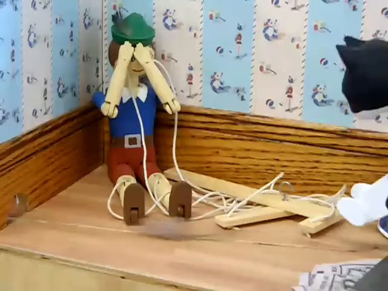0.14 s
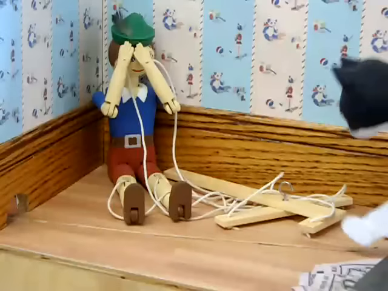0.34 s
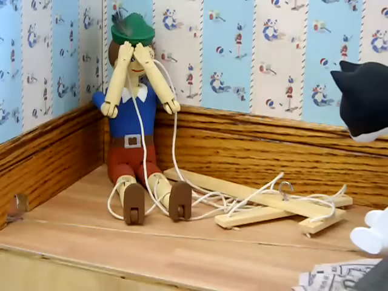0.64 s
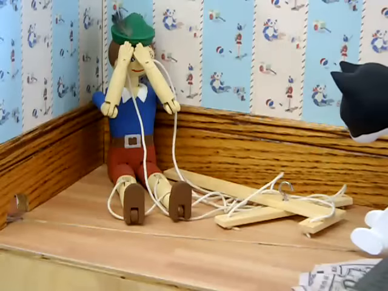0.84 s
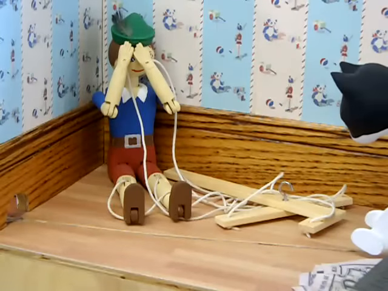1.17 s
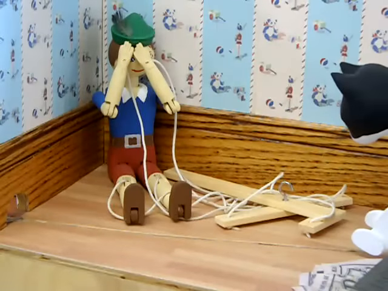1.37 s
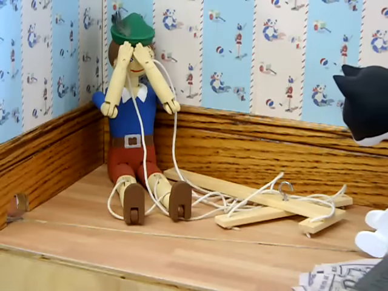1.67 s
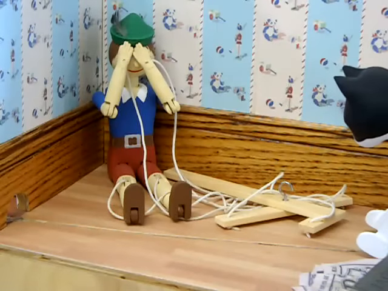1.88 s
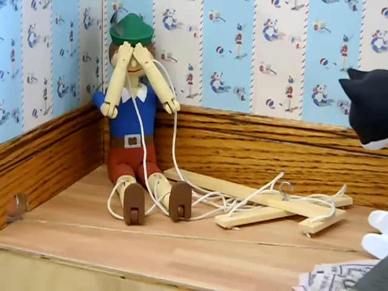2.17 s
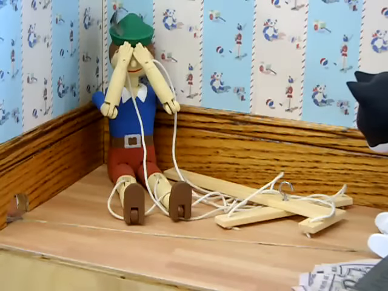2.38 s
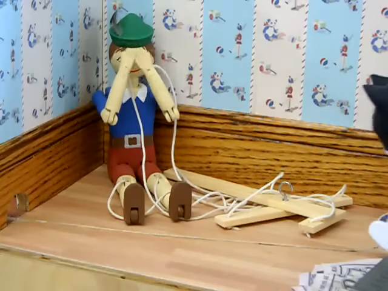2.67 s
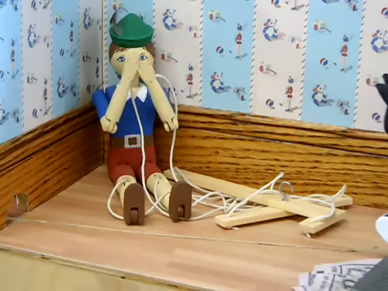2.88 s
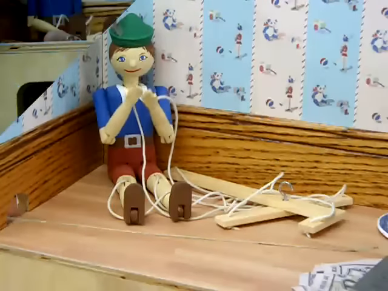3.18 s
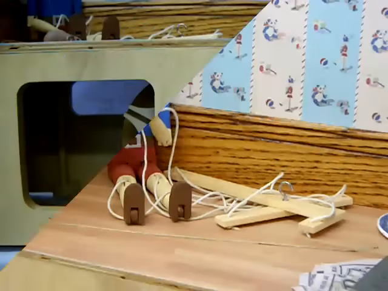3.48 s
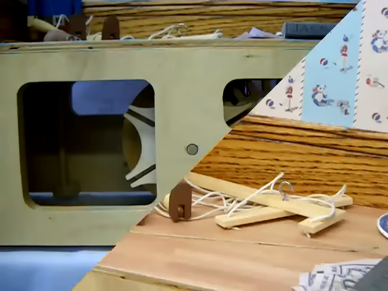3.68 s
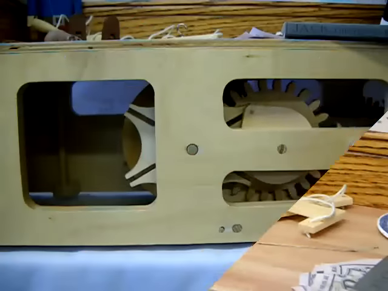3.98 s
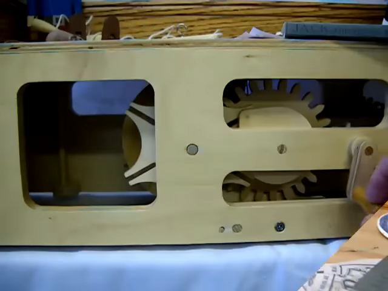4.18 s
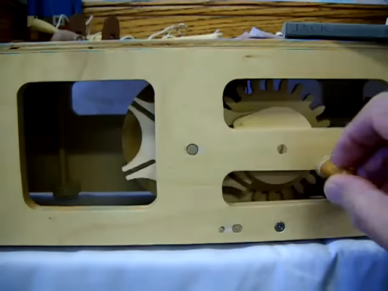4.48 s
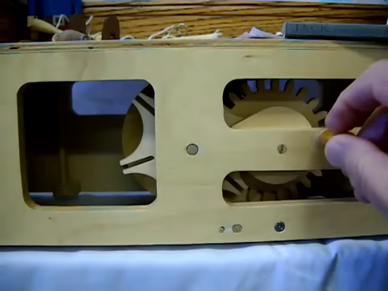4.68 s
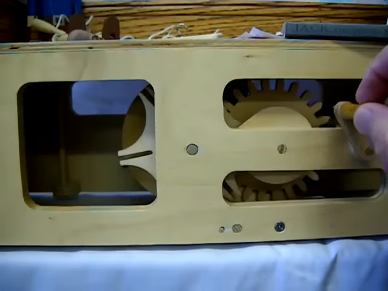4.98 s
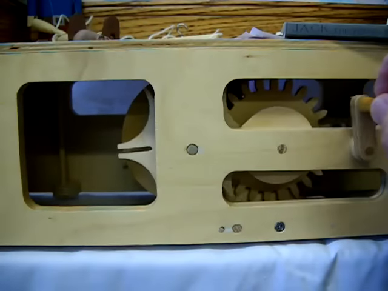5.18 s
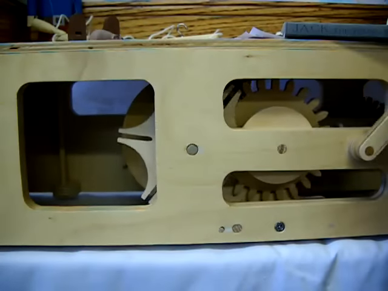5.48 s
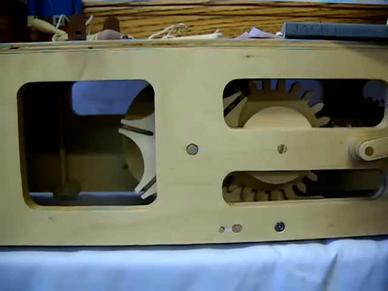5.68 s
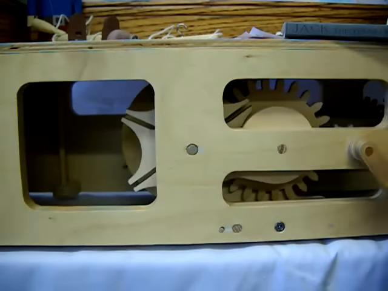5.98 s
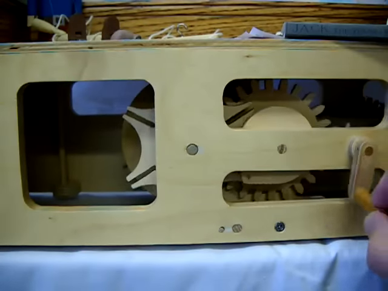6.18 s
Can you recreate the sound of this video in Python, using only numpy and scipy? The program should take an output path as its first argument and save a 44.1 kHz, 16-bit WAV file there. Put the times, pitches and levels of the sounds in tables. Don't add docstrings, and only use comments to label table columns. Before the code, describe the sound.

A quiet small room with steady soft hiss and a faint low mains hum of about 60 Hz that swells and fades. From 0 to 0.4 s, light wooden gear ticks and soft hollow knocks. At about 0.46 s a catch snaps very loudly, and a slide rattles and scrapes dryly along its wooden rail, densest near 0.5 s, with another burst of hard knocks at 0.97 to 1.03 s, stopping by 1.1 s. From 1.1 to 2.7 s, sparse small ticks over faint rubbing. At 2.82 s a lever lands with one sharp, dry clack and tiny rebounds. From 3 s the works sound closer: rougher shaft rub, ticks and boxy knocks, with a brighter click at 3.9 s. After 4.6 s the rub eases, leaving spaced clicks, one clearer near 6 s, until about 6.3 s. Small camera microphone, limited treble, short tail.

```python
import sys
import numpy as np
from scipy import signal
from scipy.fft import rfft, irfft
from scipy.io import wavfile
from scipy.ndimage import uniform_filter1d

SR = 44100
rng = np.random.default_rng(int(sys.argv[2]) if len(sys.argv) > 2 else 0)


def transcribe(u):
    v = np.clip(np.atleast_2d(u).T, -1, 1)
    q = np.round(v * 32767).astype(np.int16)
    wavfile.write(sys.argv[1], SR, q)


def field_ratio(decibels):
    return 10 ** (np.asarray(decibels, dtype=float) / 20)


N = 279594

# frequency in Hz, density in dB per Hz.
AIR_SPECTRUM = [(12, -42), (20, 4), (54, -10), (109, -7.5), (280, -11), (407, -8), (1220, -12),
                (2220, -14.5), (3220, -18), (4030, -21.5), (4920, -24.5), (6000, -32.5), (7700, -51),
                (10000, -83), (16900, -120)]
# middle in seconds, length in seconds, level in dB.
HUM_SWELLS = [
    (.2, .9, -55.5),
    (.93, .45, -54),
    (1.3, .6, -55.5),
    (1.75, .5, -62),
    (2.3, .9, -53.5),
    (2.97, .24, -57),
    (3.58, 1.0, -52.5),
    (4.45, .55, -49),
    (5.0, .7, -54.5),
    (5.82, .85, -54.5),
]
# time in seconds, level in dB, linear between rows.
SHAFT_RUB = [(0.0, -52), (0.35, -60), (1.45, -60), (1.9, -55), (2.75, -55), (2.98, -58), (3.05, -47.5),
             (4.45, -46.5), (4.67, -55), (5.6, -58), (6.0, -53), (6.34, -54)]
# frequency in Hz, density in dB per Hz.
RASP_SPECTRUM = [(760, -19), (1300, -6.5), (1590, -3), (2720, -7.5), (3150, -9.5), (4030, -12),
                 (5060, -16.5), (6370, -21), (7600, -21.5), (9880, -75), (16700, -120)]
# ring in Hz, width in Hz, level in dB.
BOX_PANELS = [(364, 133, -7.5), (447, 240, -2), (537, 133, 0.5), (702, 200, -3), (829, 232, -5.5),
              (1135, 116, -10)]
# start in seconds, peak in dB, main ring in Hz.
TEETH_ABOVE = [(0.0094, -41.5, 2030), (0.1481, -38, 2380), (0.283, -38.5, 2560), (0.386, -44, 2250),
               (0.399, -39, 3220), (1.1109, -42, 3170), (1.2241, -38.5, 2620), (1.3717, -47, 2230),
               (1.5281, -39, 3100), (1.6665, -39.5, 2300), (1.7804, -43, 2100), (1.8827, -40.5, 3160),
               (1.9195, -41, 2520), (2.0118, -40, 2700), (2.1335, -39.5, 2170), (2.2425, -37, 3190),
               (2.3565, -40.5, 2010), (2.4515, -48, 2510), (2.4755, -40, 2900), (2.6554, -41, 2330)]
# start in seconds, peak in dB, main ring in Hz.
TEETH_BESIDE = [(2.9327, -39.5, 3140), (3.03, -39, 1680), (3.0706, -42, 3030), (3.086, -37, 3150),
                (3.2294, -36.5, 3300), (3.259, -35, 2130), (3.2982, -42, 2390), (3.3111, -39, 3220),
                (3.3773, -40.5, 3310), (3.5064, -36, 2280), (3.5347, -36.5, 3310), (3.6273, -41, 2360),
                (3.932, -43, 2520), (4.0447, -42.5, 1770), (4.0846, -42.5, 3350), (4.145, -41.5, 1890),
                (4.2297, -45, 1650), (4.2403, -44, 2400), (4.4237, -44, 2070), (4.4707, -44, 3060),
                (4.5288, -37, 1680)]
# start in seconds, peak in dB, main ring in Hz,
# scuff length in seconds.
STAR_PINS = [(3.7442, -35.5, 3170, .003), (3.7539, -34, 3480, .006), (3.8967, -29.5, 3400, .003),
             (4.3505, -36, 3170, .003), (4.6243, -39.5, 3190, .006), (4.8268, -38, 3310, .0055),
             (5.3525, -35.5, 2600, .007), (5.5903, -37, 2500, .008), (5.7693, -42, 2400, .012),
             (5.9853, -30.5, 3200, .003), (6.1155, -37, 3220, .0045), (6.1236, -40, 3300, .005),
             (6.1579, -46, 3560, .006), (6.2635, -38.5, 2600, .004), (6.2764, -45, 3290, .005)]
# ring in Hz, width in Hz, level in dB.
TOOTH_RINGS = [(2360, 305, -6), (3220, 370, 5), (3620, 250, -12.5)]
# ring in Hz, width in Hz, level in dB.
TOP_RINGS = [(4400, 300, -7), (4800, 380, 0), (5400, 700, -16)]
# ring in Hz, width in Hz, level in dB.
PIN_RINGS = [(2340, 500, -1), (3190, 280, 10), (3620, 250, -4)]
# ring in Hz, width in Hz, level in dB.
RAIL_RINGS = [(1700, 900, -8), (2600, 1800, -10), (3800, 1300, -10), (5600, 1500, -19)]
# wheel share in dB, top share in dB, scuff length in seconds, tap over scuff.
ABOVE_CONTACT = (-9, -11, .005, 6)
BESIDE_CONTACT = (-2, -12, .0055, 4)
PIN_CONTACT = (-12, -7.5, 6)
JOLT_CONTACT = (-7, -17, .0052, 3)
CRACK_CONTACT = (-5, -17)
# start in seconds,
# peak in dB, panel in Hz.
BACKLASH_KNOCKS = [(0.097, -46, 510), (0.16, -44, 560), (0.287, -40, 756), (0.39, -40.5, 430),
                   (1.225, -41.5, 746), (1.606, -42, 420), (1.783, -42.5, 422), (1.88, -39.5, 660),
                   (2.009, -42, 915), (2.135, -39.5, 921), (2.242, -39, 550), (2.361, -38.5, 706),
                   (2.396, -43, 620), (2.474, -42, 420),
                   (3.026, -35.5, 656), (3.217, -42, 417), (3.26, -31.5, 850), (3.369, -38, 507),
                   (3.508, -39, 560), (3.54, -42, 708), (3.68, -32.5, 615), (3.882, -40.5, 574),
                   (4.147, -43.5, 744), (4.199, -44, 440), (4.329, -32.5, 480), (4.472, -38, 600),
                   (4.531, -36.5, 530), (4.626, -38, 810), (4.827, -41.5, 544), (5.168, -42.5, 536),
                   (5.281, -44.5, 585), (5.355, -38.5, 530), (5.591, -42, 797), (5.772, -43.5, 436),
                   (6.117, -38, 545), (6.19, -43, 550), (6.267, -40.5, 540)]
# time in seconds, level in dB.
SLIDE_CREEP = [
    (0.36, -66),
    (0.41, -51),
    (0.44, -51),
    (0.457, -42),
    (0.475, -42),
]
# time in seconds, level in dB.
SLIDE_RUN = [
    (0.5, -39.5),
    (0.6, -41.5),
    (0.65, -46),
    (0.72, -42),
    (0.84, -42),
    (0.885, -38.5),
    (0.99, -41),
    (1.055, -44.5),
    (1.12, -66),
]
# start in seconds, peak in dB, main ring in Hz.
SLIDE_JOLTS = [(0.4836, -22, 2520), (0.504, -31, 3160), (0.514, -20, 3620), (0.5317, -18, 3800),
               (0.5344, -23, 4400), (0.5494, -28.5, 2900), (0.569, -31, 1700), (0.594, -31.5, 3100),
               (0.636, -33.5, 2540), (0.6805, -32, 1700), (0.72, -35, 1540), (0.732, -34, 1650),
               (0.7801, -33, 2900), (0.831, -34, 2210), (0.8726, -30, 1560), (0.8956, -32, 1870),
               (0.95, -38, 1610), (0.966, -20, 3120), (0.974, -23, 1880), (1.0066, -26, 3080),
               (1.019, -38, 1800), (1.0306, -21, 1720), (1.036, -32, 2000), (1.052, -33, 2860)]
# start in seconds, peak in dB, main ring in Hz,
# scuff length in seconds.
CRACKS = [
    (0.4645, -14.5, 2420, 0.0017),
    (.468, -17.5, 1770, 0.006),
    (2.803, -43, 2400, 0.0075),
    (2.818, -16.5, 2850, 0.0012),
    (2.8205, -20, 3000, 0.0015),
    (2.825, -30, 3030, 0.0024),
]
# start in seconds, peak in dB, panel in Hz,
# decay t60 in seconds, frame share in dB.
BOX_BLOWS = [(0.425, -34, 700, 0.096, -10), (0.465, -12.5, 760, 0.045, -14), (.5, -30, 500, .08, 0),
             (0.535, -20, 684, 0.15, -25), (.572, -29, 700, .1, -20), (0.777, -31, 694, 0.064, -14),
             (0.868, -33, 830, 0.12, -21), (0.928, -31, 720, 0.075, -18), (0.967, -22, 600, 0.08, -22),
             (1.03, -23, 592, 0.08, -7), (2.8205, -20, 630, 0.08, -10)]
# start in seconds, level in dB, decay t60 in seconds.
FRAME_THUMPS = [
    (.44, -47, .6),
    (.466, -40, .6),
    (.52, -42, .5),
    (.63, -50, .8),
    (1.033, -39, .3),
    (2.822, -47, .3),
]
# frequency in Hz, t60 in seconds.
ROOM_DECAY = [(200, 0.7), (1000, 0.43), (3000, 0.12), (7000, 0.14)]
# frequency in Hz, level in dB.
MIC_RESPONSE = [(20, -1), (4800, 0), (5800, -2), (6600, -7), (7600, -19)]
# frequency in Hz, width in Hz, depth in dB.
MIC_PORT = (4020, 300, -14)
# lower band edge in Hz, least level of the band's strongest line in dB.
GATE_BANDS = [(7650, -97.5), (8800, -101.7), (9600, -95.3), (10650, -90.5), (11500, -88.5), (12300, -80.5),
              (13100, -74), (13700, 0)]
STRAY_EDGES = [200, 900, 1600, 2300, 3000, 3900, 4600, 5500, 6500, 7600, 9000, 10000, 11400]

CAMERA_RATE = 16000


def evened(x):
    return x / np.sqrt(np.mean(x ** 2) + 1e-20)


def peaked(x):
    return x / abs(x).max()


def read(points, hz):
    f, value = np.transpose(points)
    return np.interp(np.log(hz + 1), np.log(f + 1), value)


def follow(rows):
    s, level_db = np.transpose(rows)
    return np.interp(np.arange(N) / SR, s, level_db)


def add(mix, s, sound):
    part = mix[round(s * SR):][:len(sound)]
    part += sound[:len(part)]


def colour(x, points):
    gain = field_ratio(read(points, np.fft.rfftfreq(len(x), 1 / SR)))
    return irfft(rfft(x) * gain, len(x))


def ring(x, hz, width):
    pole = np.exp((2j * np.pi * hz - np.pi * width) / SR)
    return 2 * signal.lfilter([1 - abs(pole)], [1, -pole], x).real


def modes(x, table):
    out = 0
    for k, (hz, width, db) in enumerate(table):
        out = out + (-1) ** k * field_ratio(db) * ring(ring(x, hz, width), hz, width)
    return out


def air():
    return field_ratio(-52.5) * evened(colour(rng.standard_normal(N), AIR_SPECTRUM))


def hum():
    t = np.arange(N) / SR
    power = 0
    for middle, length, db in HUM_SWELLS:
        arch = np.cos(np.pi * np.clip((t - middle) / length, -.5, .5)).clip(0)
        power = power + (field_ratio(db) * arch ** .7) ** 2
    return np.sqrt(2 * power) * np.sin(2 * np.pi * 60.3 * t)


def grit(per_s, spread_db):
    size = field_ratio(spread_db * np.minimum(rng.exponential(1, N), 4)) * rng.standard_normal(N)
    return evened(size * (rng.random(N) < per_s / SR))


def panels(force):
    out = 0
    for k, (hz, width, db) in enumerate(BOX_PANELS):
        out = out + (-1) ** k * field_ratio(db) * ring(force, hz, width)
    return evened(out)


def scrape(level_db, rasp_db, thud_db, force):
    rasp = evened(colour(force, RASP_SPECTRUM))
    thud = evened(ring(ring(force, 181, 180), 180, 180))
    return field_ratio(level_db) * (panels(force) + field_ratio(rasp_db) * rasp + field_ratio(thud_db) * thud)


def works():
    slips = grit(per_s=5000., spread_db=2.5)
    return field_ratio(-6.5) * scrape(follow(SHAFT_RUB), rasp_db=-1, thud_db=-5, force=slips)


def tick(s, db, hz, wheel_db, top_db, scuff, tap, rings):
    t = np.arange(2048) / SR
    envelope = np.minimum(t / .001, 1) * np.exp(-(t / max(scuff, .0004)) ** 2)
    force = rng.standard_normal(len(t)) * envelope + tap * (t == 0)
    middle = peaked(modes(force, rings + [(hz, 600, 2)]))
    top = field_ratio(top_db) * peaked(modes(force, TOP_RINGS))
    wheel = field_ratio(wheel_db) * peaked(modes(force, [(1380, 3000, 0)]))
    return s, field_ratio(db) * (middle + top + wheel)


def gear_ticks():
    out = np.zeros(N)
    rings = [(hz, width, db - 5) for hz, width, db in TOOTH_RINGS] + [(2600, 2220, -12)]
    for rows, contact in [(TEETH_ABOVE, ABOVE_CONTACT), (TEETH_BESIDE, BESIDE_CONTACT)]:
        for row in rows:
            add(out, *tick(*row, *contact, rings))
    wheel_db, top_db, tap = PIN_CONTACT
    for s, db, hz, scuff in STAR_PINS:
        add(out, *tick(s, db, hz, wheel_db, top_db, scuff, tap, PIN_RINGS))
    return out


def knock(s, db, hz, t60, frame_db):
    t = np.arange(8192) / SR
    push = np.exp(-t / 0.0016)
    shiver = 0.35 * field_ratio(-60 * t / max(t60, .01))
    force = rng.standard_normal(len(t)) * np.minimum(t / 0.0028, 1) * (push + shiver)
    force = ring(force, 545, 550)
    struck = [(hz, 0), (1.6 * hz, -7)]
    frame = [(355, frame_db + 11.5), (275, frame_db - 3), (170, frame_db - 5.5)]
    neighbours = [(f, d - 3) for f, _, d in BOX_PANELS[1:]]
    width = 3.9 / max(t60, .01)
    body = sum(field_ratio(d) * evened(ring(force, f, width)) for f, d in struck + frame + neighbours)
    return s, field_ratio(db) * peaked(body)


def backlash():
    out = np.zeros(N)
    for row in BACKLASH_KNOCKS:
        add(out, *knock(*row, t60=.07, frame_db=-13))
    return out


def slide():
    before = (SLIDE_CREEP[0][0] - .02, -120)
    after = (SLIDE_RUN[-1][0] + .04, -120)
    level_db = follow([before, *SLIDE_CREEP, *SLIDE_RUN, after])
    bite_db = 1.1 * np.maximum(level_db + 42, 0)
    return scrape(level_db, bite_db - 1.5, -14, grit(per_s=4500., spread_db=1.7))


def blows():
    out = np.zeros(N)
    for row in BOX_BLOWS:
        add(out, *knock(*row))
    return out


def thumps():
    t = np.arange(N) / SR
    size = 0
    for s, db, t60 in FRAME_THUMPS:
        size = size + np.clip((t - s) / .006, 0, 1) * field_ratio(db - 60 * np.maximum(t - s, 0) / t60)
    return size * evened(ring(ring(rng.standard_normal(N), 170, 170), 170, 170))


def clatter():
    out = np.zeros(N)
    for row in SLIDE_JOLTS:
        add(out, *tick(*row, *JOLT_CONTACT, RAIL_RINGS))
    for s, db, hz, scuff in CRACKS:
        add(out, *tick(s, db, hz, *CRACK_CONTACT, scuff, 5., RAIL_RINGS))
    return out


def room(x):
    hz, t, z = signal.stft(rng.standard_normal(SR // 2), SR, nperseg=256)
    decay = field_ratio(-60 * t / read(ROOM_DECAY, hz)[:, None])
    tail = signal.istft(z * decay, SR, nperseg=256)[1]
    delayed = np.r_[np.zeros(200), tail]
    return signal.fftconvolve(x, delayed / np.linalg.norm(tail))[:N]


def scene():
    wood = works() + gear_ticks() + backlash() + slide() + blows() + thumps() + clatter()
    wood = colour(wood, MIC_RESPONSE)
    heard = wood + field_ratio(-12.5) * room(wood) + air()
    hz, width, db = MIC_PORT
    port = signal.filtfilt(*signal.iirpeak(hz, hz / width, SR), heard)
    heard = heard - (1 - field_ratio(db)) * port
    return np.tile(heard + hum(), (2, 1))


def treble_gate(x):
    hz, t, z = signal.stft(x, SR, "cosine", 1024, 512)
    loud_db = 10 * np.log10((abs(z[hz > 300]) ** 2).mean(0) + 1e-20)
    masking_db = .4 * np.maximum(loud_db + 79.5, 0)
    for (lo, least_db), (hi, _) in zip(GATE_BANDS, GATE_BANDS[1:] + [(SR, 0)]):
        band = (hz >= lo) & (hz < hi)
        level_db = 10 * np.log10((abs(z[band]) ** 2).max(0) + 1e-20)
        whim_db = 2.3 * evened(uniform_filter1d(rng.standard_normal(len(t)), size=3))
        z[band] *= level_db > least_db + masking_db + whim_db
    chance = rng.random((len(t) // 2 + 1, len(STRAY_EDGES) + 1)).repeat(2, 0)[:len(t)]
    stray = (chance < .12)[:, np.searchsorted(STRAY_EDGES, hz)].T
    stray = stray * np.clip(hz / 3000, 0, 1)[:, None] ** 2
    side = field_ratio(-15) * z * stray * np.exp(2j * np.pi * rng.random(z.shape))
    return signal.istft(np.array([z + side, z - side]), SR, "cosine", 1024, 512)[1][:, :N]


def band_limit(x):
    return signal.sosfilt(signal.butter(12, 13760, fs=SR, output="sos"), x)


def record(dry):
    hz = np.fft.rfftfreq(N, 1 / SR)
    band = (hz < 7600) / np.sinc(np.minimum(hz, 7600) / CAMERA_RATE) ** 2
    slow = signal.resample_poly(irfft(rfft(dry[0]) * band, N), 160, 441)
    mirrored = np.interp(np.arange(N) * CAMERA_RATE / SR, np.arange(len(slow)), slow)
    return band_limit(treble_gate(mirrored))


dry = scene()
out = record(dry)
transcribe(out)
```